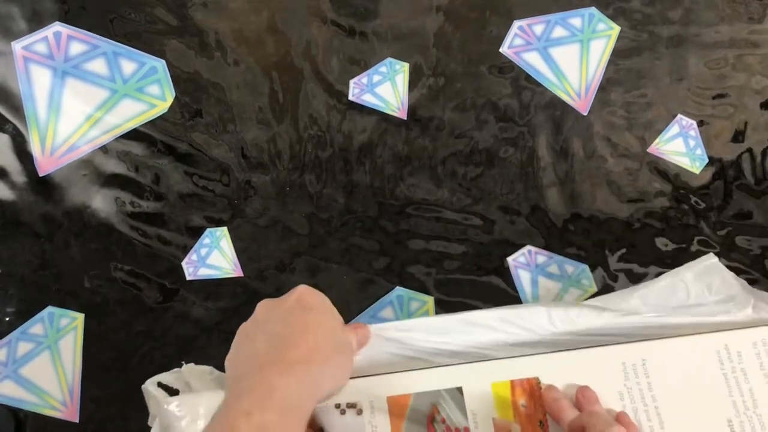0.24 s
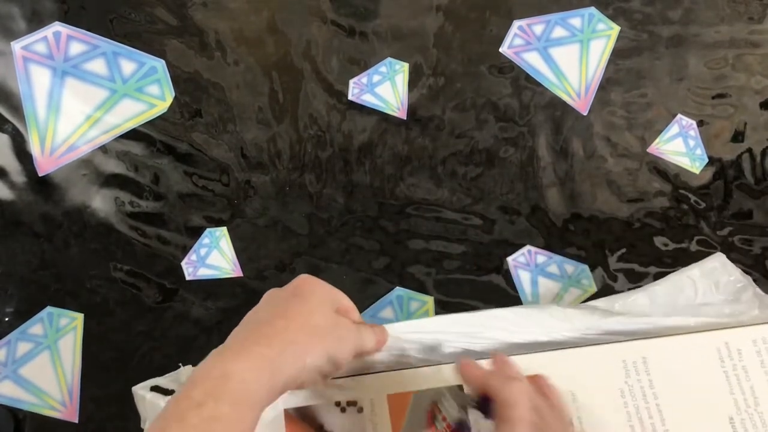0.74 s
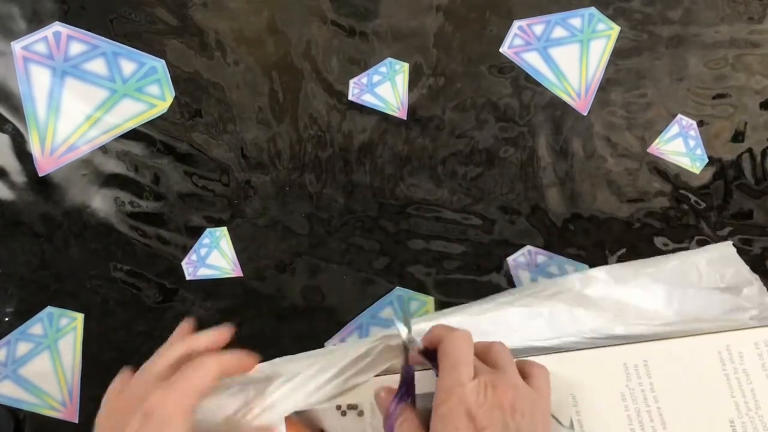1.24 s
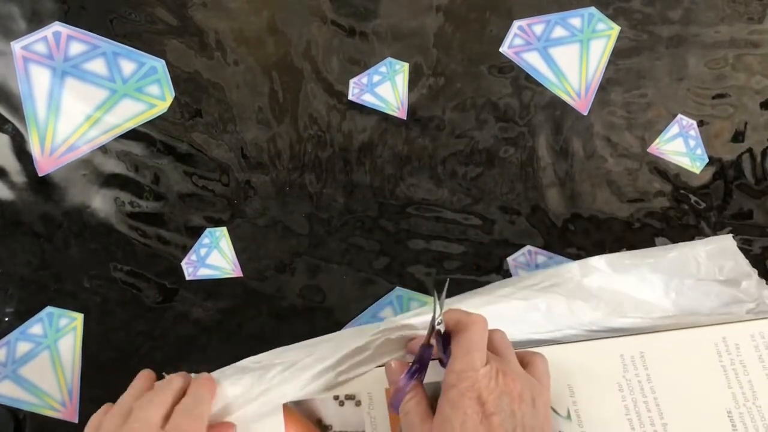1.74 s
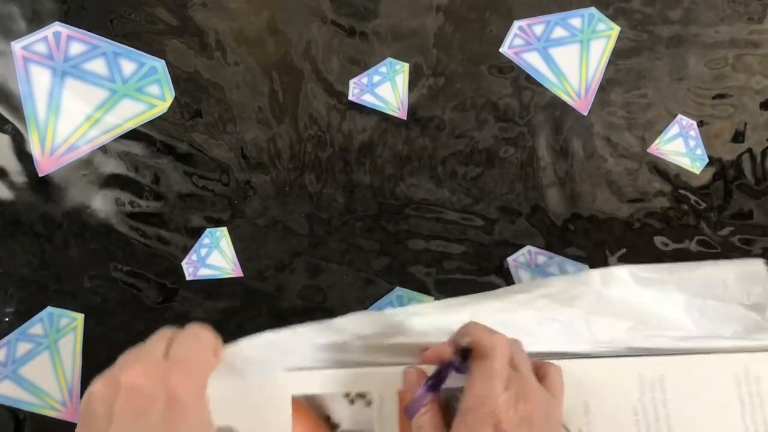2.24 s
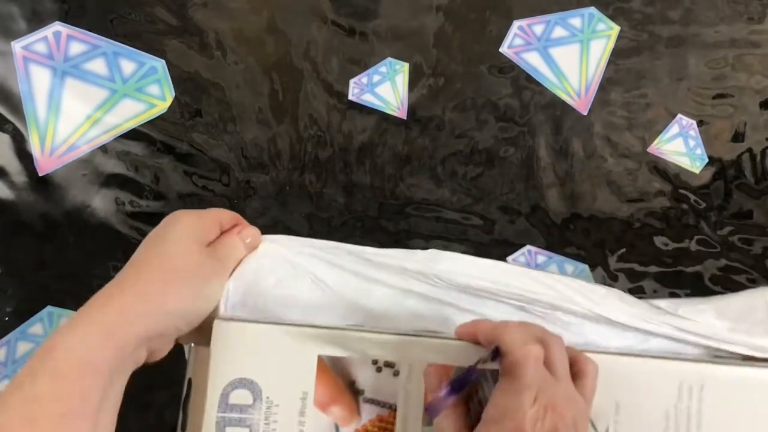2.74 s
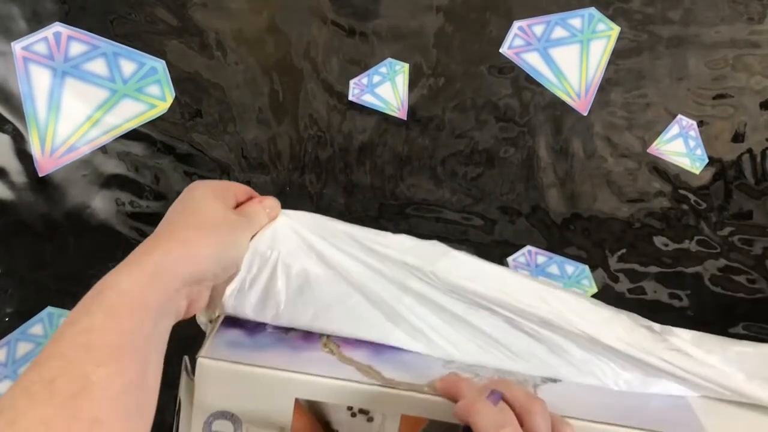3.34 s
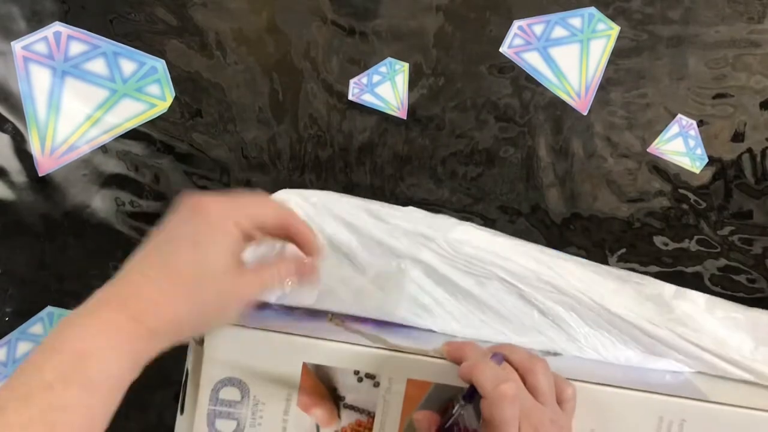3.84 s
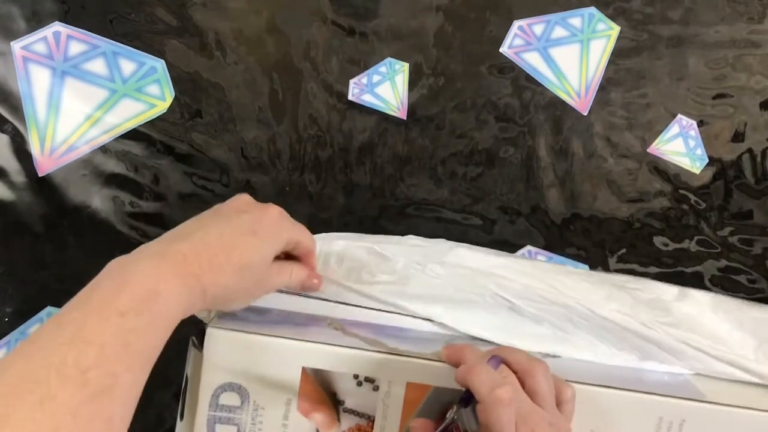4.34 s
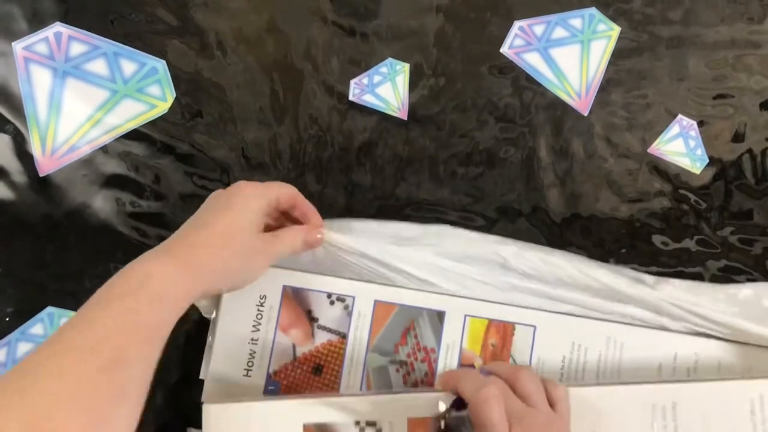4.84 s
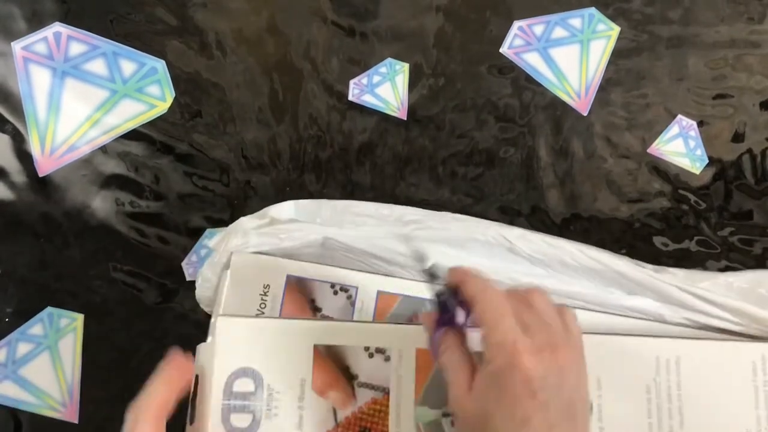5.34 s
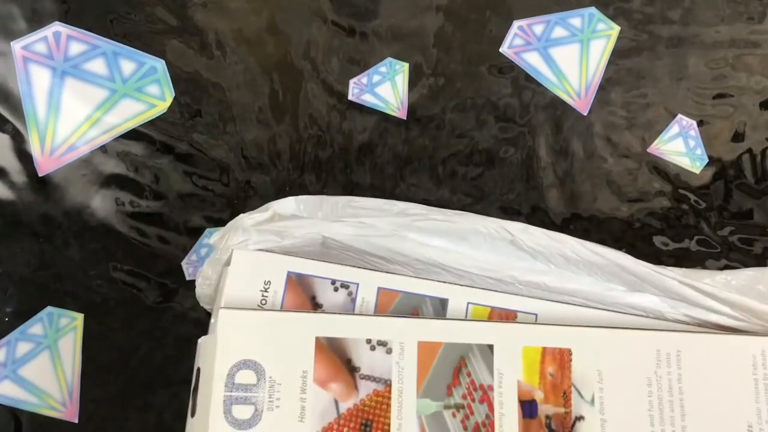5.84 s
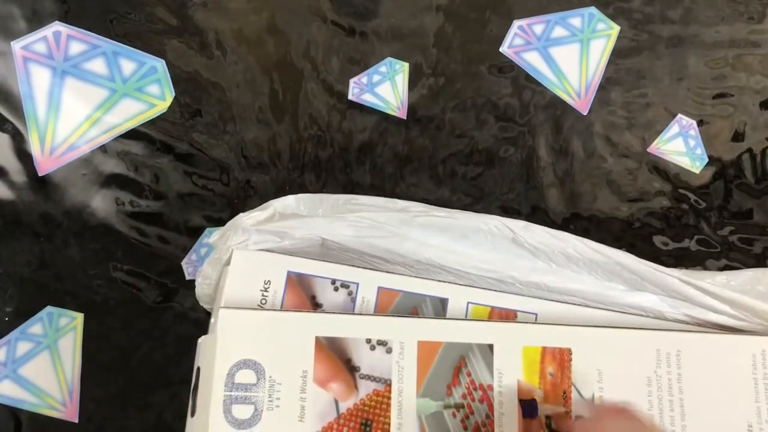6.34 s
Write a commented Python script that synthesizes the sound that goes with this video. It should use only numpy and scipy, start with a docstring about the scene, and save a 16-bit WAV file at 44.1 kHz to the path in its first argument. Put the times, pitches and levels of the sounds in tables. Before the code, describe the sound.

A close microphone over a table catches crisp plastic film popping and rustling, cardboard rubbing and soft low bumps through the tabletop. The crackling gathers around two seconds, thins, then peaks after four with a cluster of loud hollow knocks. After a lull over faint room air, loose scissor blades clatter down near six seconds, ringing briefly in a small, short-tailed room.

```python
"""Cardboard box out of a plastic mailer

A cardboard box is worked out of a plastic mailer bag on a table, heard close up in a small room.
The film snaps, crumples, creaks and rustles: clicks excite creases, each with its own resonant pitch.
The box scrapes in random slips and knocks in decaying modes, and filtered noise rumbles in the table.
At the end scissors are put down: noisy clacks, and steel modes that ring on."""
import sys
import numpy as np
from scipy import signal
from scipy.fft import rfft, irfft
from scipy.io import wavfile
from scipy.ndimage import uniform_filter1d

SR = 44100
rng = np.random.default_rng(int(sys.argv[2]) if len(sys.argv) > 2 else 0)


def master(y):
    """Save y as 16-bit WAV."""
    cut = np.clip(np.atleast_2d(y).T, -1, 1)
    pcm = np.round(cut * 32767)  # scale
    wavfile.write(sys.argv[1], SR, pcm.astype(np.int16))


N = 290643

# single creases of the film popping, loud ones and faint ones that stand alone:
# start_s, energy_db, centre_hz
SNAPS = [(0.172, -4, 4840), (0.296, -7, 6660), (0.373, -8.5, 3200), (0.425, -7, 7100), (0.441, -4, 4000),
         (0.467, -5.5, 4540), (0.572, -6, 6940), (0.58, -4, 7000), (0.601, -0.5, 8300), (0.67, -3.5, 4680),
         (0.747, 1.5, 6000), (0.831, 0.5, 2800), (1.368, -17, 8400), (1.416, -2.5, 7650), (1.47, -9, 9400),
         (1.513, -8.5, 8060), (1.601, -5.5, 8500), (1.618, -11.5, 4650), (1.635, -3.5, 7100),
         (1.723, -8, 8100), (1.778, 2, 6600), (1.792, 9.5, 4500), (1.806, 10, 6140), (1.859, 11.5, 7100),
         (2.009, 3, 7260), (2.038, 3.5, 10700), (2.052, -8, 10600), (2.093, -5, 6000), (2.152, 1, 4360),
         (2.204, -4, 8000), (2.297, -4.5, 11000), (2.36, -1.5, 4640), (2.376, -7, 2880), (2.446, 1, 2200),
         (2.467, 2, 2700), (2.558, 0, 1900), (3.113, -11, 4200), (3.119, -2.5, 4770), (3.322, -5.5, 7940),
         (3.471, -5.5, 3500), (3.757, -15, 1800), (4.017, -11, 7400), (4.078, 3, 6960), (4.17, 5, 6100),
         (4.245, -1.5, 4000), (4.368, 9.5, 3180), (4.375, 10.5, 2720), (4.402, 1, 3700), (4.466, -1, 7300),
         (4.758, 1, 5600), (5.102, -14.5, 7400), (5.178, -12, 4800), (5.219, -14, 9500)]
# knocks, soft hand rubs and small ticks on the box, and the scissors landing on it,
# relative energies: start_s, thud_db (hollow body), clack_db (wall)
KNOCKS = [(0.444, -1, -5), (0.733, -17, -1.5), (0.812, -16, -3), (0.83, 0, 6), (0.939, 4, 6),
          (1.792, -17, 1), (1.859, -2, 3), (2.079, 3, 0.5), (2.127, -2, -13), (2.204, -6.5, -3.5),
          (2.447, -18, 14), (2.466, 2.5, 8.5), (2.542, 11, 15.5), (2.556, 1.5, 13.5), (2.597, 3, 9.5),
          (2.661, 1, 8.5), (2.844, 4, -12), (3.113, 1.5, 3), (3.163, -11, 3.5), (3.43, -15, -2),
          (3.875, -3, -24), (3.914, -0.5, -23), (4.169, -0.5, 10), (4.244, -3, 2), (4.273, 10.5, 7.5),
          (4.297, 10.5, 17.5), (4.304, 16.5, 20), (4.376, 13, 10), (4.4, 13, 15.5), (4.408, 18.5, 20.5),
          (4.598, -12, -10.5), (4.756, 0, 3), (4.993, -19, -8), (5.178, -14, -6.5), (5.28, -23, -15),
          (5.553, -34, -39), (5.693, -33, -25), (5.848, -35, -23.5), (6.122, -9.5, 3.5), (6.208, 3.5, -5)]
# separate tugs and rubs, the last one the scissors touching the cardboard,
# relative levels: start_s, length_s, film_db (rustle), box_db (scrape)
STROKES = [(0.0, 0.0091, -34, -27.5), (0.315, 0.03, -39.5, -42), (0.402, 0.069, -56, -33.5),
           (0.715, 0.085, -35.5, -40.5), (1.126, 0.11, -50.5, -48), (1.405, 0.026, -40, -43.5),
           (1.61, 0.027, -54, -42), (2.008, 0.1, -32.5, -33), (2.332, 0.12, -35.5, -41),
           (2.529, .07, -33, -27.5), (2.66, 0.043, -32.5, -29.5), (2.828, 0.064, -33.5, -30.5),
           (3.045, .13, -34.5, -34), (3.294, 0.048, -40, -35), (3.425, 0.055, -41.5, -34.5),
           (3.747, 0.036, -48, -33), (3.865, 0.044, -49, -41.5), (3.993, 0.039, -37, -33),
           (4.088, 0.023, -37.5, -29), (4.268, 0.036, -29.5, -14), (4.389, 0.022, -33, -22.5),
           (4.619, 0.14, -37, -38), (4.88, 0.054, -44.5, -42.5), (5.078, 0.078, -51, -49.5),
           (5.949, 0.038, -72, -40)]
STROKE_RISE_S, STROKE_FALL_S = 0.0076, 0.026
# modes of the hollow box: pitch_hz, level_db, t60_s
BOX_MODES = [(195, -11.5, 0.038), (260, -5, 0.054), (295.5, -6, 0.05), (390, 1, 0.06), (396, -3.5, 0.069),
             (524, -5.5, 0.13), (572.6, -6, 0.11), (605.5, -2, 0.074), (698, -2, 0.049),
             (820, -10.5, 0.092), (914, -9, 0.14), (1020, -8, 0.074), (1344, -2.5, 0.047),
             (1478, -9, 0.069)]
# decay of the cardboard wall by band: pitch_hz, t60_s
WALL_T60 = [(200, 0.042), (800, 0.035), (2000, 0.024), (8000, 0.074)]


def amp(db):
    """Decibels to gain."""
    return 10 ** (np.asarray(db) / 20)


def unit(x):
    """Scales to an energy of one."""
    return x / np.sqrt(np.sum(x ** 2) + 1e-20)


def evened(x):
    """Scales to an rms of one."""
    return unit(x) * np.sqrt(len(x))


def read(points, hz):
    """Reads a table along a log-frequency axis."""
    f, value = np.transpose(points)
    return np.interp(np.log(hz + 1), np.log(f + 1), value)


def follow(rows, axis):
    """One dB column of a curve as a gain for every sample."""
    rows = np.array(rows)
    return amp(np.interp(np.arange(N) / SR, rows[:, 0], rows[:, axis]))


def add(mix, s, sound):
    """Mixes a sound in at s seconds."""
    part = mix[max(round(s * SR), 0):][:len(sound)]
    part += sound[:len(part)]


def through(x, response):
    """Convolves and keeps the length."""
    return signal.oaconvolve(x, response)[:len(x)]


def focus_loss(hz, centre_hz, focus_db):
    """Loss in dB away from a centre: focus_db at one octave, at most twice that."""
    return focus_db * np.minimum(np.log2(hz / centre_hz) ** 2, 2)


def pulse(spectrum, centre_hz=1000, focus_db=0, ripple_db=0, size=512):
    """A minimum-phase click: a spectrum focused on a centre, with chance resonances of ripple_db."""
    hz = np.fft.rfftfreq(size, 1 / SR)
    ripple = evened(np.convolve(rng.standard_normal(len(hz)), np.hanning(size // 32), "same"))
    db = read(spectrum, hz) - focus_loss(hz + 1, centre_hz, focus_db) + ripple_db * ripple
    # folding the cepstrum gathers the energy at the start
    cepstrum = irfft(np.log(amp(db)))
    cepstrum[1:size // 2] *= 2
    cepstrum[size // 2 + 1:] = 0
    return unit(irfft(np.exp(rfft(cepstrum))))


def noise(spectrum):
    """Steady noise of a given spectrum, rms one."""
    gain = amp(read(spectrum, np.fft.rfftfreq(N, 1 / SR)))
    return evened(irfft(rfft(rng.standard_normal(N)) * gain, N))


def dying(t60, size):
    """Noise in which each band dies at its own speed."""
    hz, t, bands = signal.stft(rng.standard_normal(size), SR, nperseg=128)
    decay = amp(-60 * t / read(t60, hz)[:, None])
    return unit(signal.istft(bands * decay, SR, nperseg=128)[1])


def ring(modes, spread_db, size, detune=0):
    """The modes of a struck body, weighted by chance and shifted in pitch by a random detune."""
    hz, db, t60 = np.transpose(modes)[:, :, None]
    t = np.arange(size) / SR
    weight, shift = rng.standard_normal((2, len(hz), 1))
    envelope = amp(db + spread_db * weight - 60 * t / t60)
    tone = np.cos(2 * np.pi * hz * (1 + detune * shift) * t)
    return unit((envelope * tone).sum(0))


def clicks(per_s, spread_db, size):
    """Random clicks, many small and a few large, with a mean power of one."""
    chance, sign = rng.random((2, size))
    height = amp(spread_db * np.minimum(rng.exponential(1, size), 3.5))
    return evened(height * np.sign(sign - .5) * (chance < per_s / SR))


def swells(rows, rise_s, fall_s):
    """Power of (start_s, length_s, level_db) gestures that each rise, hold and die away."""
    t, power = np.arange(SR) / SR, np.zeros(N)
    for s, length, db in rows:
        rise = np.minimum(t / rise_s, 1)
        fall = np.exp(-np.maximum(t - length, 0) / fall_s)
        add(power, s, (amp(db) * rise * fall) ** 2)
    return power


def underlying(axis):
    """Gain of the handling between and under the tugs, which ends when the hands let go."""
    # the underlying handling as it rises and falls, relative levels:
    # start_s, film_db (rustle), box_db (scrape)
    handling = [(0.0, -37, -45.5), (0.36, -46, -48.5), (0.69, -44, -54), (0.82, -38, -32),
                (1.17, -54.5, -61), (1.41, -60.5, -50), (1.9, -33.5, -41.5), (2.38, -44, -44),
                (2.58, -37, -33), (3.27, -40, -45.5), (3.53, -45, -47), (3.78, -49.5, -42.5),
                (4.01, -45.5, -39), (4.29, -26.5, -32.5), (4.42, -43, -47), (5.03, -50, -46),
                (5.36, -66.5, -77.5), (5.9, -63.5, -67.5)]
    return follow(handling, axis) * (np.arange(N) / SR < handling[-1][0])


def room(x, wet_db=-7, build_s=0.0017):
    """Reflections build up within a few milliseconds and die away."""
    # decay of the room by band: pitch_hz, t60_s
    room_t60 = [(150, 0.13), (700, 0.27), (3000, 0.2), (8000, 0.24), (15000, 0.2)]
    tail = dying(room_t60, size=20000)
    build = 1 - np.exp(-(np.arange(len(tail)) / SR / build_s) ** 2)
    return x + amp(wet_db) * through(x, unit(tail * build))


def air():
    """The still air of the room as steady noise."""
    # spectrum of the air: pitch_hz, level_db (per Hz, relative)
    air_spectrum = [(18, -30), (30, 0), (215, -15), (512, -21.5), (702, -21.5), (866, -19.5), (937, -25),
                    (2060, -29.5), (2410, -22), (3140, -38.5), (6900, -34.5), (10200, -31.5),
                    (16000, -43.5)]
    level_db = -53
    return amp(level_db) * noise(air_spectrum)


def table():
    """The table top rumbles under the hands and gives a low bump at every contact with the box."""
    # spectrum of the trembling table: pitch_hz, level_db (per Hz, relative)
    rumble_spectrum = [(8, -4), (22, 6.5), (35, -13), (58, -14), (90, -26), (150, -32), (300, -40),
                       (1000, -73)]
    # the hands leaning on the table: start_s, length_s, level_db
    leans = [(0.0, 0.26, -37.5), (3.8, 0.1, -23), (4.06, 0.089, -26.5)]
    tremble_db, lean_rise_s, lean_fall_s = -43.5, 0.025, 0.042
    contacts = np.zeros(N)
    for s, thud_db, clack_db in KNOCKS:
        # the hands cushion the hardest knocks
        add(contacts, s, amp([min(max(thud_db, clack_db), 4)]))
    bumps = through(contacts, ring([(68.0, 0, 0.082), (126, -2, 0.019)], spread_db=7.5, size=8192))
    shake = np.sqrt(amp(tremble_db) ** 2 + swells(leans, lean_rise_s, lean_fall_s))
    return shake * noise(rumble_spectrum) + amp(-15) * bumps


def scissors(count=4):
    """Loose blades chatter at every touch and ring on, in several slightly detuned copies."""
    # touching down and bouncing, relative energies: start_s, clack_db, ring_db, contact_hz (centre)
    bounces = [(5.952, -17.5, -11, 1500), (5.975, -13.5, -32, 4470), (6.077, -13.5, -33, 1680),
               (6.093, 4.5, 1, 8750), (6.122, 14, 18.5, 6000), (6.206, 8.5, 13, 3800),
               (6.247, 2, 1.5, 4470), (6.299, -0.5, -7, 3700)]
    # modes of the steel blades: pitch_hz, level_db, t60_s
    steel_modes = [(1650, -14, 0.6), (2427, -5.5, 0.92), (2597, 7, 0.35), (3010, -5.5, 1),
                   (3225, -13, 1.75), (3730, -9, 0.82), (3870, 6, 0.44), (4130, 6, 0.24), (5370, 6.5, 0.35),
                   (5030, 1.5, 0.49), (6170, 17, 0.23), (6000, 1, 0.41), (6300, -2.5, 0.17),
                   (6920, 0, 0.22), (8200, 7, 0.27), (8700, 2, 0.15), (9108, -5, .18)]
    # spectrum of the contact: pitch_hz, level_db (per Hz, relative)
    clack_spectrum = [(150, -1.5), (520, 2.5), (1400, 2.5), (1900, -6.5), (3000, -9.5), (4700, -8.5),
                      (6100, 2.5), (7500, -7.5), (9200, 1), (12500, -3), (16000, -23)]
    contact_focus_db = 3.5  # loss of a blade mode an octave from the centre of the contact
    out = np.zeros(N)
    frame = dying([(500, 0.61), (3000, 0.13), (12000, 0.023)], size=8192)
    flutter = np.exp(-np.arange(len(frame)) / SR / 0.0062)
    for s, clack_db, ring_db, contact_hz in bounces:
        chatter = unit(rng.standard_normal(len(frame)) * flutter)
        contact = pulse(clack_spectrum, contact_hz, focus_db=5.0)
        clack = unit(through(chatter + amp(-6.0) * frame, contact))
        reached = [(hz, db - focus_loss(hz, contact_hz, contact_focus_db), t60)
                   for hz, db, t60 in steel_modes]
        blades = sum(ring(reached, spread_db=3, size=32768, detune=shift)
                     for shift in np.linspace(.002, .016, count))
        add(out, s, amp(clack_db) * clack)
        add(out, s, amp(ring_db - 6) * unit(blades))
    return out


def box_motion():
    """The box moves with the handling and the strokes, and slides on after every contact."""
    handling_db = -1.5
    slide_db, slide_s = -34.5, 0.024  # level against the clack's energy, time constant
    strokes = swells([(s, length, db) for s, length, _, db in STROKES], STROKE_RISE_S, STROKE_FALL_S)
    sliding = swells([(s, 0, db + slide_db) for s, _, db in KNOCKS], rise_s=0.0056, fall_s=slide_s)
    return np.sqrt((amp(handling_db) * underlying(axis=2)) ** 2 + strokes + sliding)


def scrape():
    """The box sticks and slips; each slip sounds its wall, and its hollow hums along."""
    # spectrum of a slip: pitch_hz, level_db (per Hz, relative)
    slip_spectrum = [(70, 6.5), (150, -10.5), (300, 4), (600, 3), (1250, 3.5), (2300, -11), (4000, -30.5),
                     (10000, -17)]
    slips = box_motion() * clicks(per_s=380, spread_db=3.2, size=N)
    wall = unit(through(dying(WALL_T60, size=4096), pulse(slip_spectrum)))
    body = amp(-8) * wall + amp(-8.5) * ring(BOX_MODES, spread_db=2, size=len(wall))
    hollow = ring([(409, 0, 0.015)], spread_db=0, size=len(wall))
    rub = amp(-11.5) * through(slips, pulse(slip_spectrum))
    return rub + through(slips, body + amp(-18) * hollow)


def knocks():
    """Each contact is a push, a short clack of dense wall modes and the thud of the whole box."""
    # spectrum of the wall: pitch_hz, level_db (per Hz, relative)
    wall_spectrum = [(60, -16), (200, -22.5), (450, 4.5), (900, 8), (1450, 5.5), (2000, -13), (2800, -5.5),
                     (3800, -9.5), (5000, -16), (12000, -28)]
    out, push = np.zeros(N), pulse(wall_spectrum)
    for s, thud_db, clack_db in KNOCKS:
        wall = unit(through(dying(WALL_T60, size=4096), push))
        # a soft contact with little clack reaches only the low modes
        reach_hz = np.clip(1300 * amp(.5 * (clack_db - thud_db)), 300, 4000)
        lowpass = signal.butter(2, reach_hz, fs=SR, output="sos")
        thud = unit(signal.sosfilt(lowpass, ring(BOX_MODES, spread_db=5.5, size=8192)))
        add(out, s, amp(clack_db - 12) * push)
        add(out, s, amp(clack_db - 5.5) * wall)
        add(out, s, amp(thud_db) * thud)
    return out


def film_motion():
    """The film moves with the handling and the strokes, and small creases settle after every snap."""
    handling_db = -2.5
    settle_db, settle_s = -44.5, .035  # level against the snap's energy, time constant
    strokes = swells([(s, length, db) for s, length, db, _ in STROKES], STROKE_RISE_S, STROKE_FALL_S)
    settling = swells([(s, 0, db + settle_db) for s, db, _ in SNAPS], rise_s=.003, fall_s=settle_s)
    return np.sqrt((amp(handling_db) * underlying(axis=1)) ** 2 + strokes + settling)


def crack(centre_hz, focus_db, size=512):
    """A crease flips over with resonances of its own, and the film around it flutters for a moment."""
    # spectrum of the film: pitch_hz, level_db (per Hz, relative)
    film_spectrum = [(100, -17.5), (400, -4.5), (1200, 4), (2000, 3), (2900, -5.5), (3800, -3), (4600, -7),
                     (6500, -3), (10500, 1), (13000, -2), (16000, -12.5)]
    flutter_s = .001
    drive = 1.4 * unit(rng.standard_normal(size) * np.exp(-np.arange(size) / SR / flutter_s))
    drive[0] += 1  # the flip itself
    return unit(through(drive, pulse(film_spectrum, centre_hz, focus_db, ripple_db=4)))


def crackle(train, focus_db, count=40):
    """Hands each click to one of many creases; the few under strain change as the bag moves."""
    moving = np.arange(N) * 14 // SR  # the strained group steps on 14 times a second
    crease = (moving + rng.integers(0, count // 5, N)) % count
    # stepping by 17 gives neighbouring creases distant pitches
    pitches = np.geomspace(2800, 13000, count)[np.arange(count) * 17 % count]
    return sum(through(train * (crease == k), crack(hz, focus_db)) for k, hz in enumerate(pitches))


def rustle():
    """Small creases tick over the fine hiss of film sliding on cardboard, with sparser, larger pops."""
    level = film_motion()
    ticks = crackle(level * clicks(per_s=210, spread_db=2.6, size=N), focus_db=7)
    hiss = crackle(level * clicks(per_s=6000, spread_db=3, size=N), focus_db=3)
    pops = crackle(level * clicks(per_s=30, spread_db=1.2, size=N), focus_db=5.5)
    return amp(-3.5) * (ticks + pops + amp(-0.5) * hiss)


def creak():
    """The stretched film sticks and slips in an almost even run of ticks."""
    # the film drawn taut: start_s, level_db, slip_rate_hz
    stretch = [(.07, -45, 130), (0.119, -40, 99), (0.198, -40, 100), (.26, -54, 220)]
    # modes of the taut film: pitch_hz, level_db, t60_s
    taut_modes = [(2430, -4, 0.0071), (3800, 0.5, 0.0078), (6000, 7, 0.0031)]
    s, db, per_s = np.transpose(stretch)
    t, out = np.arange(s[0], s[-1], 1 / SR), np.zeros(N)
    unevenness = evened(uniform_filter1d(rng.standard_normal(len(t)), 400))
    turns = np.cumsum(np.interp(t, s, per_s) * amp(2 * unevenness)) / SR
    slips = evened(np.diff(np.floor(turns), prepend=0))  # one tick per whole turn
    level = amp(np.interp(t, s, db))
    add(out, s[0], through(level * slips, ring(taut_modes, spread_db=4.0, size=1024)))
    return out


def crumples(count=5, size=8192):
    """A few neighbouring creases fire in a dense run that starts at once and thins out."""
    # a whole fold collapsing in a run of cracks: start_s, length_s, level_db, centre_hz
    folds = [(0.0, 0.024, -26.5, 4960), (0.83, 0.008, -27, 3200), (0.935, 0.015, -24.5, 3260),
             (1.722, 0.027, -23.5, 7500), (1.86, 0.012, -18, 7500), (2.041, 0.04, -19.5, 10100),
             (3.082, 0.011, -25.5, 9000), (3.12, 0.012, -23.5, 7000), (4.097, 0.028, -23.5, 8500),
             (4.16, 0.034, -21, 7000), (4.271, 0.071, -19, 6900), (4.377, 0.047, -18.5, 3330),
             (4.398, 0.029, -13.5, 3530), (4.735, 0.03, -25, 6500)]
    t, out = np.arange(size) / SR, np.zeros(N)
    for s, length, db, hz in folds:
        fade = np.exp(-(t / length) ** 2)
        run = sum(through(fade * clicks(per_s=310, spread_db=3.0, size=size), crack(hz, focus_db=3.5))
                  for _ in range(count))
        add(out, s, amp(db) * unit(run) * np.linalg.norm(fade))
    return out


def snaps():
    """Single creases flip over one by one, loud or faint, each in one crack."""
    out = np.zeros(N)
    for s, db, hz in SNAPS:
        add(out, s, amp(db) * crack(hz, focus_db=4.5))
    return out


def scene():
    """Bag, box and scissors in the room, over the table's rumble and the still air."""
    steel = room(scissors(), wet_db=-8.5)
    box = room(knocks() + scrape(), wet_db=-9)
    bag = room(snaps() + crumples() + rustle() + creak(), wet_db=-9.5)
    return (air() + table() + steel + box + bag)[None]


def record(dry):
    """Peaks beyond full scale overload the input and clip; then a low-pass limits the band."""
    edge_hz = 16000
    clipped = np.clip(dry, -1, 1)
    lowpass = signal.firwin(255, edge_hz, window=("kaiser", 8), fs=SR)
    return signal.oaconvolve(clipped, lowpass[None], "same")


dry = scene()
out = record(dry)
master(out)
```